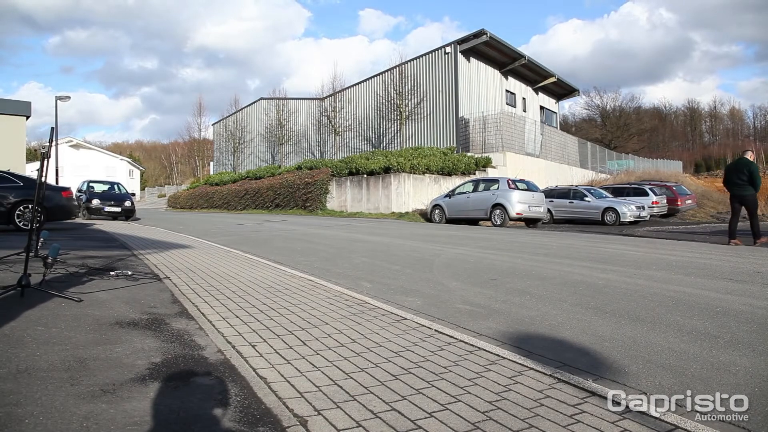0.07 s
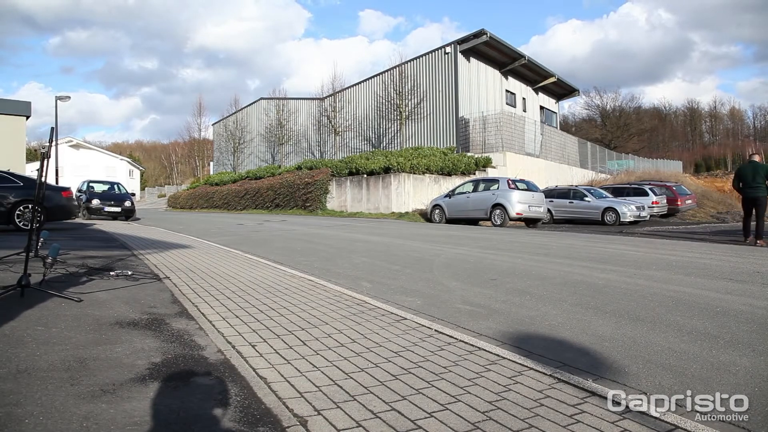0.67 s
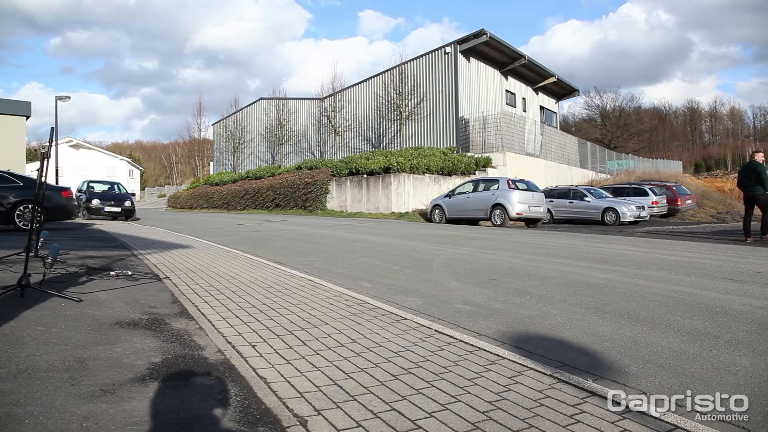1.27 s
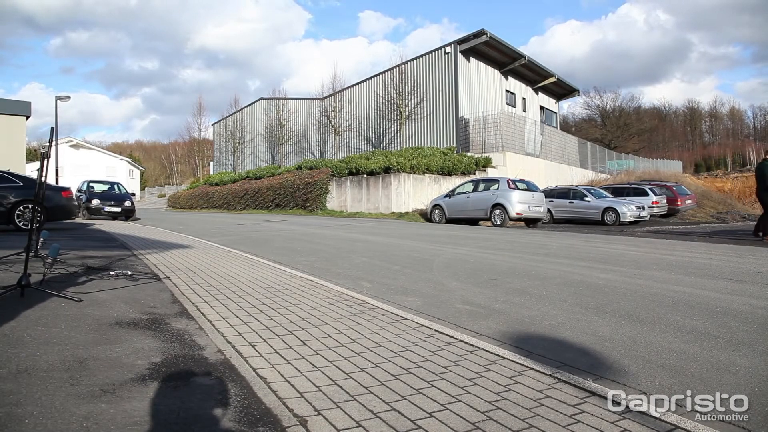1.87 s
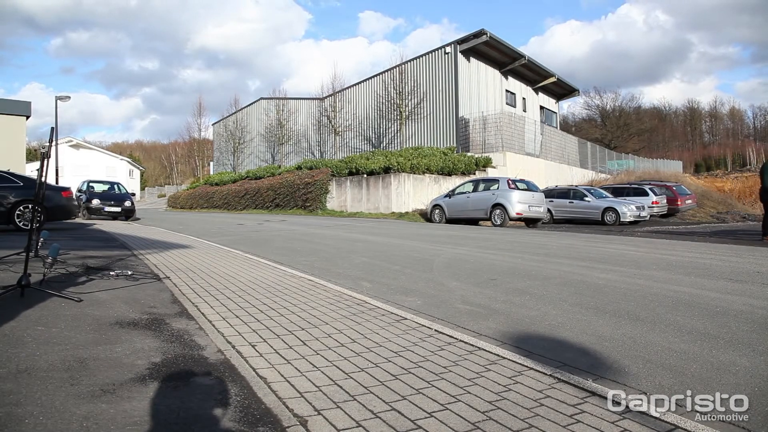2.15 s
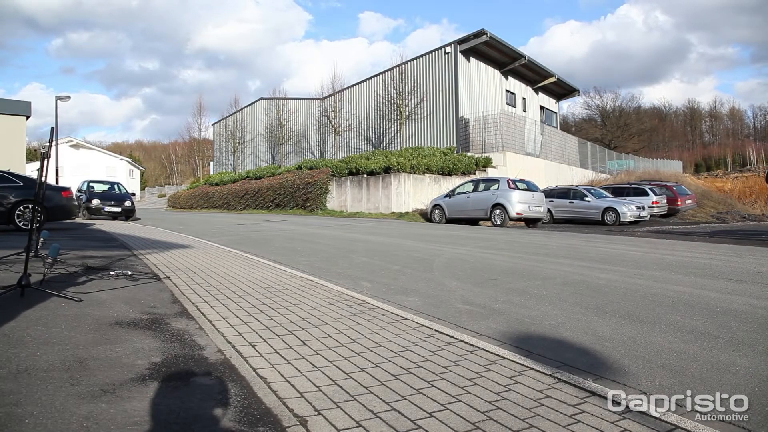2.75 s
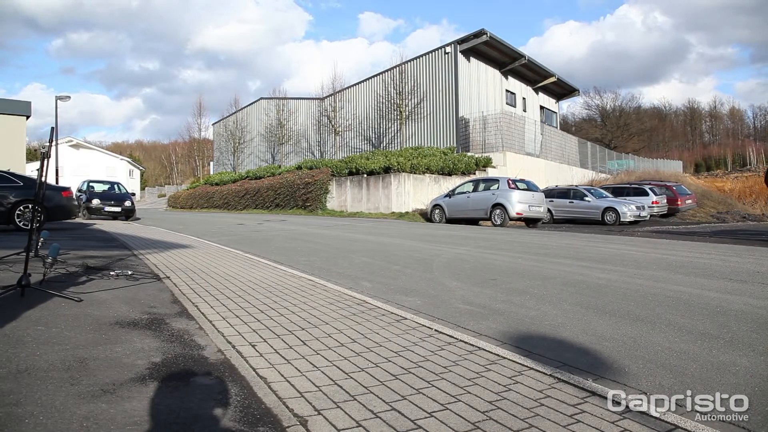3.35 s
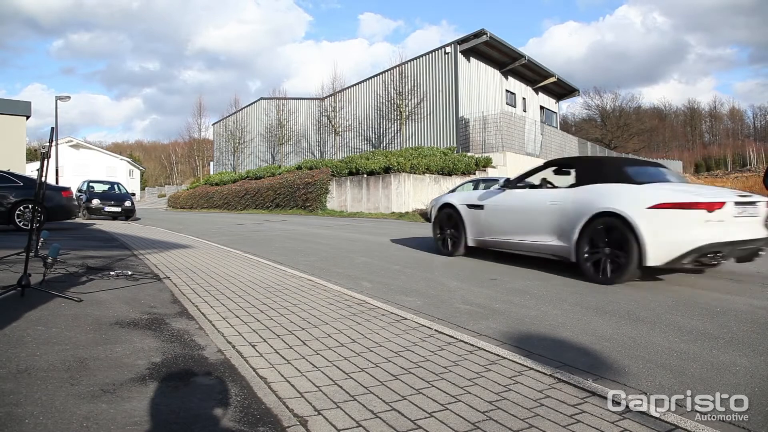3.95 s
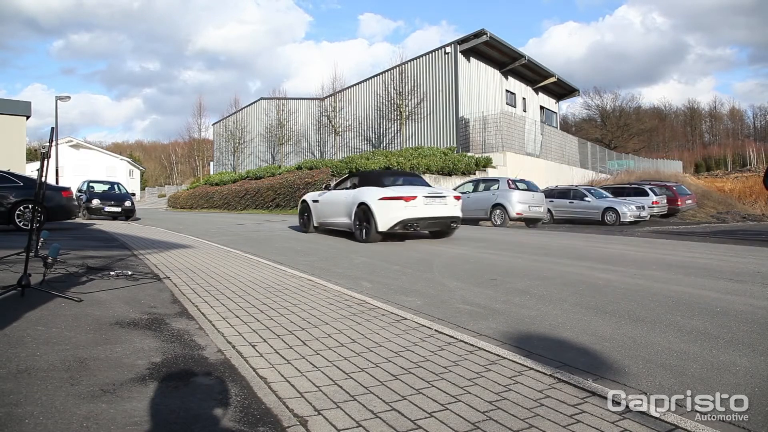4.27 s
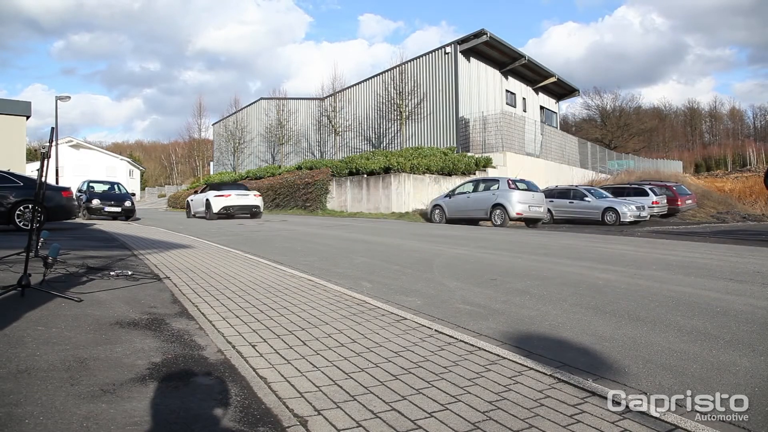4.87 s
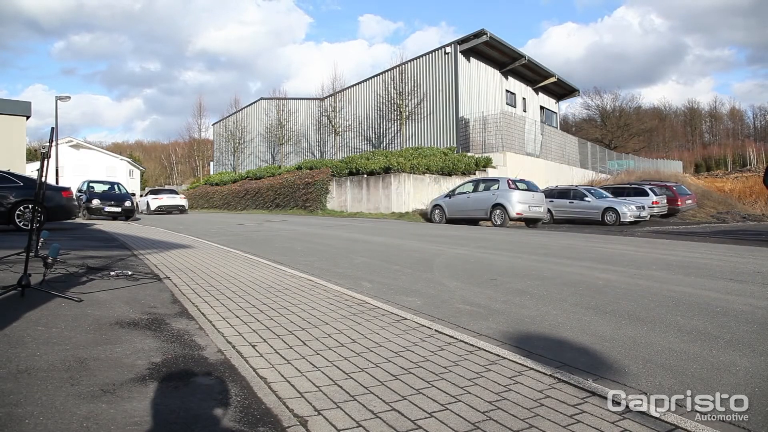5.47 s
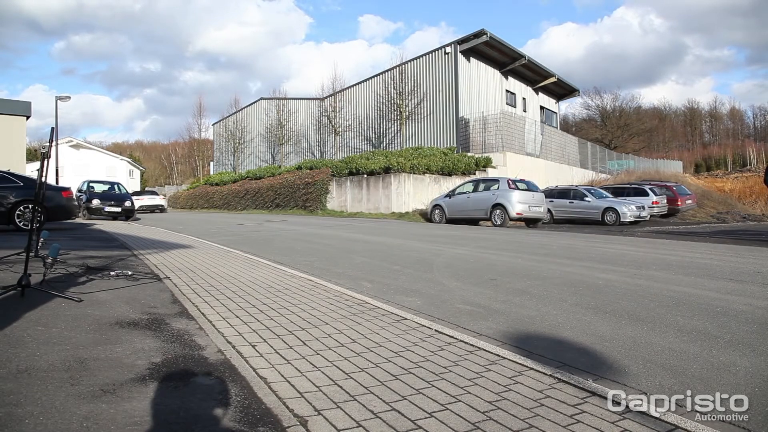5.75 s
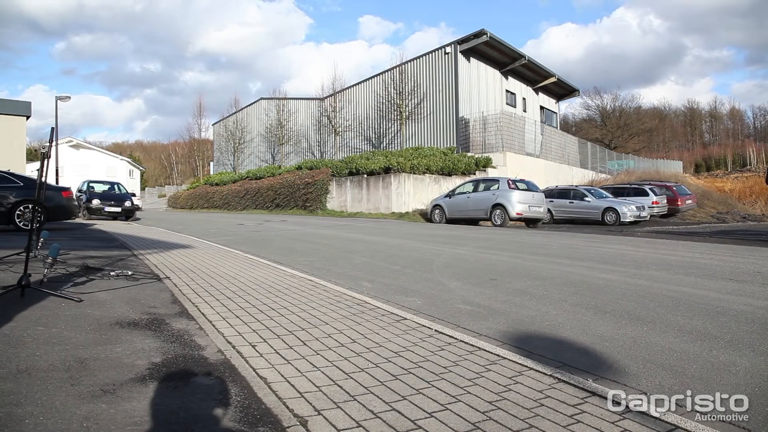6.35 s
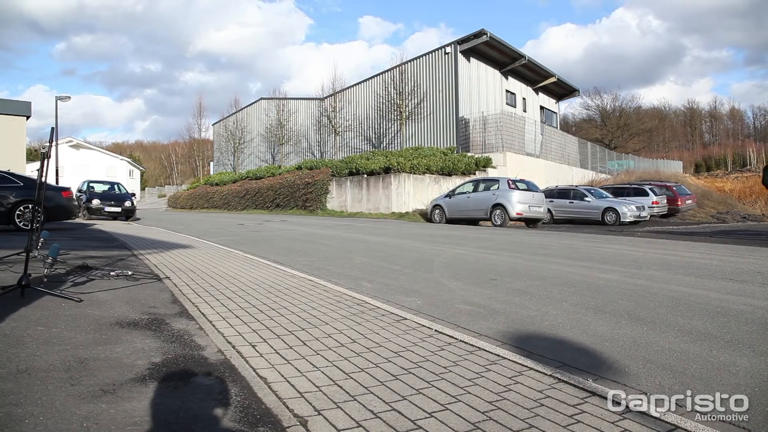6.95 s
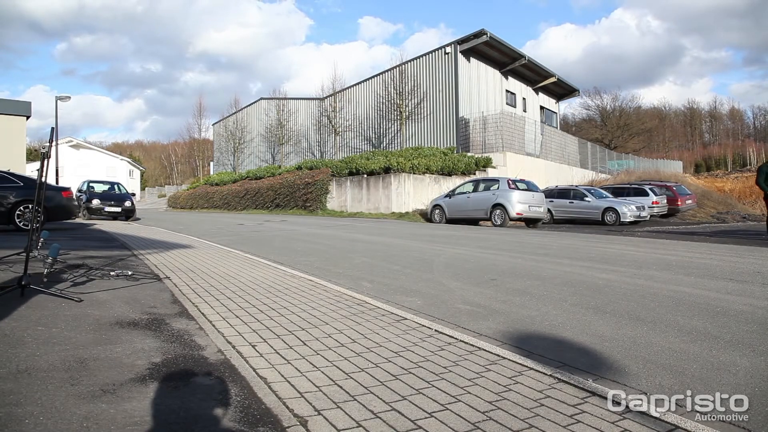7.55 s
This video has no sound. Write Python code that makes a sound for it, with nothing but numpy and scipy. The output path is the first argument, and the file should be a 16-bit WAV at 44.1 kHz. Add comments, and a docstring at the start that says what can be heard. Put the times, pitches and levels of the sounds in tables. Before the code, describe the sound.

A sports car approaches with a deep drone, roars by under throttle, then fires rapid exhaust pops while receding into the distance.

```python
"""V8 pass-by in a factory yard

A V8 sports car with an open exhaust accelerates past the microphone and drives off. Its engine orders
drone on the approach; the valves open to a rasping roar, unburnt fuel cracks in the tailpipes, then the
revs fall away. Walls and a distant hillside echo it. Soft thumps and scuffs sound close to the
microphone, and faint birds chirp over the yard's murmur at the end."""
import sys
import numpy as np
from scipy import signal
from scipy.fft import rfft, irfft
from scipy.io import wavfile
from scipy.ndimage import uniform_filter1d

SR = 44100
rng = np.random.default_rng(int(sys.argv[2]) if len(sys.argv) > 2 else 0)


def master_out(mix):
    """Clip the mix to full scale and print it as 16-bit PCM to the path in sys.argv[1]."""
    frames = np.transpose(np.atleast_2d(mix))
    ceiling = np.clip(frames, -1, 1)
    pcm = np.round(ceiling * 32767).astype(np.int16)
    wavfile.write(sys.argv[1], SR, pcm)


N = 340164
T = np.arange(N) / SR

# four-stroke cycle rate as heard at the microphone: (t/s, f/Hz)
CYCLE_RATE = [(0, 15.8), (.6, 18.8), (1.03, 20.9), (1.6, 17.8), (2.33, 20.5), (2.48, 20.1), (2.7, 21),
              (3.08, 22.7), (3.55, 31.8), (3.72, 31.0), (3.88, 30.2), (4.13, 28.3), (4.28, 30.3),
              (4.45, 30.8), (4.6, 32.1), (4.75, 32.4), (5.17, 35.2), (5.68, 41.3), (5.87, 36.8),
              (5.98, 32.8), (6.08, 30.8), (6.28, 30.6), (6.55, 26.6), (7.71, 18)]
# base level of the engine, and of the tyres on the approach, before the layer mix: (t/s, level/dB)
ENGINE_LEVEL = [(0, -47), (.3, -52), (.6, -45), (1.45, -41.5), (1.65, -44), (2.05, -36), (2.25, -38),
                (2.55, -35), (3.05, -20.5), (3.28, -16), (3.8, -14), (4.45, -17), (4.6, -21), (4.73, -23),
                (5.53, -29), (5.75, -38.5), (6.3, -51), (6.45, -49.5), (6.63, -52), (6.8, -51.5),
                (7.4, -58.5), (7.71, -72)]
TYRE_LEVEL = [(0, -53.5), (.8, -48), (1.15, -43), (1.7, -41), (2.4, -33.5), (2.8, -27.5), (3.1, -22)]
# side facing the microphone: (t/s, view: 0 front, 1 closing, 2 alongside, 3 tail, 4 far behind)
CAR_VIEW = [(2.6, 0), (2.9, 1), (3.2, 1), (3.55, 2), (4, 2), (4.2, 3), (5.55, 3), (5.85, 4)]
# leading orders (4 one bank, 5 and 13 the uneven beat, 8 firing, 16 its double) against the engine:
# {order: level/dB in each of the five views}
LEADING_ORDERS = {4: (-44, -36, -29, -15.5, -7), 5: (-29.5, -34, -39, -31, -16.5),
                  8: (-14, -16.5, -14, -16, -9.5), 12: (-42.5, -38, -14, -17.5, -38),
                  13: (-42, -40, -38, -33, -17), 16: (-12.5, -14.5, -26, -11.5, -31),
                  21: (-36, -40, -40, -33, -23)}
# resonances they sweep through: (order, f/Hz, half width/Hz, lift/dB)
RESONANCES = [(4, 150, 13, 17.5), (4, 110, 10, 6), (5, 153, 6.6, 15), (8, 183, 23, 14), (8, 279, 4.9, 13),
              (12, 364, 13, 11.5), (16, 325, 27, 15.5), (16, 508, 12, 13), (13, 348, 10, 18),
              (21, 545, 14, 14.5)]
# their change while cylinders skip: {order: change/dB}
MISFIRE_CHANGE = {4: -13.5, 5: -9, 8: 2.5, 12: -10, 13: -7, 16: -20.5, 21: -6}
# the other orders in each view: (multiple of the cycle rate, relative level/dB)
ORDERS_FRONT = [(5, -15.5), (7, -7.5), (10, -8.5), (11, -7), (12, -5), (13, -5.5), (14, -8.5), (15, 2),
                (17, -6), (18, -3), (22, -5), (23, -9), (24, -3.5), (25, -12), (26, -5.5), (27, -9)]
ORDERS_CLOSING = [(5, -4), (7, -10), (9, -8), (10, -1), (13, -11.5), (14, 3), (15, -11), (18, -9),
                  (21, -13.5), (30, -8)]
ORDERS_ALONGSIDE = [(2, -23), (3, -14), (5, -6.5), (6, -11), (7, -2), (9, -8.5), (10, 3), (11, -13),
                    (13, -13), (14, -7.5), (15, -10), (17, -22.5), (18, -14), (19, -10.5), (20, -9),
                    (21, -20.5), (22, -20), (23, -17.5), (24, -14.5), (25, -12), (26, -11)]
ORDERS_TAIL = [(2, -15.5), (3, -11.5), (5, 0), (6, -8.5), (7, -0.5), (9, 0.5), (10, -9.5), (11, -8),
               (13, -7), (14, -2.5), (15, -13.5), (17, -10), (18, -19), (19, -13), (20, -10), (21, -14.5),
               (22, -19), (23, -13.5), (24, -15.5), (25, -4.5), (26, -15.5), (27, -20), (28, -19),
               (29, -13.5), (30, -18)]
ORDERS_BEHIND = [(3, -25), (6, -9), (7, -2), (9, -16), (10, -20), (12, -5), (14, 2), (15, -12), (17, -7),
                 (18, -15), (20, -13.5)]
# spectra of the exhaust boom at a distance, close by and out of sight: (f/Hz, relative level/dB)
BOOM_FAR_EQ = [(35, -40.5), (70, -35.5), (125, -13.5), (200, -9), (320, -1.5), (400, -10), (470, -3),
               (540, -7), (620, -13.5), (700, -9), (780, -13.5), (900, -21), (1100, -36.5), (1500, -66),
               (6000, -110)]
BOOM_NEAR_EQ = [(20, -41), (45, -29.5), (90, -9.5), (145, -0.5), (220, -0.5), (350, 0.5), (490, 0.5),
                (650, -8.5), (780, -1), (1050, -21.5), (1500, -51)]
BOOM_HIDDEN_EQ = [(35, -51), (70, -34), (125, -16), (210, -4), (290, 2), (345, 12.5), (378, -11), (410, -9),
                  (450, -6), (525, -2.5), (620, -21), (800, -26), (1000, -35), (1500, -56), (6000, -100)]
# spectra of tyre rush, gas leaving the pipes and gas in the valves: (f/Hz, relative level/dB)
TYRE_EQ = [(450, -17.5), (740, 8), (1000, 4.5), (1300, -2), (1600, -1.5), (2000, 2.5), (2400, -9.5),
           (2850, -4), (3300, -13), (4300, -20), (6000, -38), (13000, -80)]
RASP_EQ = [(470, -17.5), (850, -1.5), (1100, 0), (1550, -4), (2400, -5.5), (3000, -12), (4000, -46),
           (13000, -73.5)]
HOWL_EQ = [(300, -31), (470, -2.5), (680, 2), (900, -0.5), (1200, -7.5), (2200, -40), (6000, -90)]
# spectra of the exhaust hiss from the side and from the tail, and of a crack: (f/Hz, relative level/dB)
SIZZLE_SIDE_EQ = [(1500, -23), (2400, -5), (2900, -1.5), (3500, 0), (4200, -3.5), (5000, 0), (5700, -1.5),
                  (6400, -2.5), (7500, -3.5), (9700, -15), (16000, -30)]
SIZZLE_TAIL_EQ = [(1500, -20), (2300, -5.5), (2950, 1), (3400, 3.5), (4000, -1), (4700, -2), (5900, -2),
                  (7100, -3), (9700, -16.5), (16000, -27)]
CRACK_EQ = [(300, -16), (700, 5.5), (1500, -3.5), (3000, 5), (4800, -0.5), (7200, 1.5), (9500, -8.5),
            (16000, -24)]
# explosions in the tailpipes: (t/s, relative level/dB)
EXHAUST_CRACKS = [(4.6146, -11.5), (4.6322, -9.5), (4.652, -11.5), (4.6818, -6.5), (4.7164, -10.5),
                  (4.7763, -2), (4.799, 4.5), (4.8108, 4.5), (4.8443, -1), (4.853, 1), (4.879, 4.5),
                  (4.922, 1), (4.9574, -4.5), (4.979, -1.5), (4.9922, -2.5), (4.999, -13), (5.0096, -7),
                  (5.0396, -12), (5.1297, -7), (5.1421, -7.5), (5.1624, -4.5), (5.1963, -1.5),
                  (5.2333, -13), (5.2461, -10.5), (5.2603, -6.5), (5.2721, 1), (5.2864, -3.5), (5.3076, -3),
                  (5.3847, -6.5), (5.4238, -4.5), (5.43, -16), (5.464, -3.5), (5.507, -11), (5.511, -17),
                  (5.521, -13), (5.5324, -9), (5.5477, -9), (5.5602, -14), (5.5911, -26), (5.6275, -21),
                  (5.6631, -13), (5.7043, -31), (5.7223, -26), (5.735, -30.5)]
# soft thumps by the microphone: (t/s, level/dB, f/Hz, decay/s)
CLOSE_THUMPS = [(.384, -31, 158, 0.0082), (.408, -39, 130, 0.0098), (.521, -27.5, 150, 0.0036),
                (.535, -41, 85, .008), (1.574, -33, 166, .005), (1.595, -47, 90, 0.0092)]
# faint scuffs by the microphone: (t/s, level/dB, length/s)
CLOSE_SCUFFS = [(0.323, -83, .1), (.55, -80, .08), (7.048, -72, .14), (7.239, -70, .08),
                (7.385, -67.5, 0.055), (7.462, -69, .028), (7.566, -69, 0.024), (7.623, -73.5, 0.023)]
# distant chirps: (t/s, length/s, f/Hz, level/dB)
BIRD_CHIRPS = [(6.1, 0.26, 3850, -71), (6.9, 0.32, 4390, -73), (7.273, 0.35, 3480, -72)]
# spectra of a thump's thud, a scuff, the hillside echo and the yard's murmur: (f/Hz, relative level/dB)
THUD_EQ = [(30, -32), (55, -12), (85, 0), (190, 0), (330, -8), (600, -30), (1500, -60)]
SCUFF_EQ = [(500, -12), (1500, -5), (4000, 0), (7500, -1), (11000, -16)]
HILL_EQ = [(60, -20.5), (110, -7), (152, 10), (215, 1.5), (280, -7.5), (350, 2.5), (420, -1.5), (490, -9),
           (550, -3), (650, -7.5), (820, -11), (1050, -19), (2000, -31.5), (9000, -75)]
YARD_EQ = [(18, -54), (30, -35), (76, -12), (211, 1.5), (511, -17), (645, -24.5), (774, -20.5),
           (928, -32.5), (3410, -32), (6040, -43.5), (11000, -56.5), (13000, -72)]
# each layer against the engine: (level/dB, then change/dB with open valves, with the tailpipes facing,
# while misfiring, in a volley of cracks, per metre driven away, once hidden)
ORDERS_BALANCE = (-7, 5, 2, -7.5, 1, 0.0322, -11)
BOOM_BALANCE = (-5, 2, -3, 3.5, 4, -0.0354, 0)
RASP_BALANCE = (-13, 6.5, 1.5, 2.5, 6, -0.5859, -4)
SIZZLE_BALANCE = (-18.5, 5, 10.5, -7, 9, 0, -18.5)

PASS_S, SPEED_M_S = 4.24, 13.3  # the car draws level with the microphone
# changes during the run: (middle t/s, length/s)
VALVES_OPEN, TAILPIPES_FACE, MISFIRING_STARTS = (3.122, .065), (3.923, .14), (4.65, .08)
FLARE_STARTS, FLARE_ENDS = (3.2, .08), (3.48, .098)  # the revs shoot up, heard mostly off the walls
SCREENED = (5.5, .038)  # a parked car comes in front of the tailpipes
CATCHES = (5.72, .18)  # the cylinders catch again for a last bark
CAR_HIDDEN, SPUTTER_ENDS = (5.89, .34), (6.05, .18)
# brief lifts around the lift-off: (middle t/s, half length/s, lift/dB)
RASP_SURGE, SIZZLE_SPIT, LIFT_OFF_THUD = (4.56, .053, 6.3), (4.6, .057, 5.9), (4.65, .033, 2.7)


def drone(cycles, leading_db, view, others_db, smear, waver_db=2.5):
    """Engine orders; shifting reflections make each waver in level and, the higher it is, in phase."""
    gains = {order: undb(db) for order, db in leading_db.items()}
    tables = ORDERS_FRONT, ORDERS_CLOSING, ORDERS_ALONGSIDE, ORDERS_TAIL, ORDERS_BEHIND
    for side, table in enumerate(tables):
        in_view = np.maximum(1 - np.abs(view - side), 0)
        weight = in_view * undb(others_db) / np.linalg.norm(undb(np.array(table)[:, 1]))
        for order, db in table:
            gains[order] = gains.get(order, 0) + weight * undb(db)
    out = 0
    for order, gain in gains.items():
        phase = 2 * np.pi * (order * cycles + rng.random()) + smear * order * walk(20)
        out = out + np.sqrt(2) * gain * undb(waver_db * walk(20)) * np.sin(phase)
    return out


def leading_level(order, cycle_hz, view, skipping):
    """A leading order's dB against the engine, from the side heard, nearby resonances and misfires."""
    swell_db = sum(db / (1 + ((order * cycle_hz - hz) / width) ** 2)
                   for k, hz, width, db in RESONANCES if k == order)
    side_db = np.interp(view, np.arange(5), LEADING_ORDERS[order])
    return side_db + swell_db + MISFIRE_CHANGE[order] * skipping


def tear(tones, depth, above_hz=260):
    """Unequal firings roughen the upper orders."""
    upper = tones - lowpass(tones, above_hz, order=4)
    return tones + depth * walk(180) * upper


def firings(cycles, scatter_db, jitter_s=.00025):
    """Eight pulses a cycle, lumpy as the banks take unequal turns, each varying in size and timing."""
    cylinder_db = np.array([3.5, -4.5, -4.5, 0, 1.5, -3, -.5, -2])
    count = np.floor(cycles * 8).astype(int)
    at = np.flatnonzero(np.diff(count))
    late = (jitter_s * SR * noise()[:len(at)]).astype(int)
    size_db = cylinder_db[count[at] % 8] + scatter_db[at] * np.clip(noise()[:len(at)], -2, 2)
    pulses = np.zeros(N)
    pulses[np.clip(at + late, 0, N - 1)] = undb(size_db)
    return pulses


def puffs(pulses, decay_s, jet):
    """Each firing releases a puff of turbulent gas over a steady jet."""
    gate = steady(decay(pulses, decay_s))
    return steady(noise() * (gate + jet))


def throb(cycles, size=128):
    """The part of the combustion that repeats every cycle: overtones whose balance slowly shifts."""
    shapes = rng.standard_normal((3, size))
    grid = np.arange(size) / size
    return steady(sum(walk(5) * np.interp(cycles, grid, shape, period=1) for shape in shapes))


def boom(pulses, cycles, near, hidden, regular):
    """Combustion rings the pipes: an even burble from afar, deep and lumpy close to the microphone."""
    burble = np.sqrt(regular) * throb(cycles)
    burble += np.sqrt(1 - regular) * puffs(pulses, decay_s=.0039, jet=1)
    distant = blend(colour(burble, BOOM_FAR_EQ), colour(burble, BOOM_HIDDEN_EQ), hidden)
    close = colour(puffs(pulses, decay_s=.0019, jet=.29), BOOM_NEAR_EQ)
    return steady(blend(steady(distant), close, near), size=3000)


def rasp(pulses, gas_share):
    """Smooth tyre rush at a distance gives way to gas tearing out of the pipes."""
    tyres = colour(noise(), TYRE_EQ)
    gas = colour(puffs(pulses, decay_s=.005, jet=1), RASP_EQ)
    return steady(bounces(blend(tyres, gas, gas_share)))


def howl(pulses, engine_db):
    """Gas forced past the half-open valves howls before the full rasp takes over."""
    gas = colour(puffs(pulses, decay_s=.0045, jet=.45), HOWL_EQ)
    return bump(s=3.1, half_length_s=.33, height=undb(engine_db - 11)) * gas


def sizzle(pulses, shock, facing, top_db):
    """Strong pulses steepen into shock clicks over the hiss; top_db moves the highest band most."""
    clicks = puffs(pulses ** 2, decay_s=.0015, jet=.03)
    hiss = puffs(pulses, decay_s=.0029, jet=1.4)
    source = np.sqrt(shock) * clicks + np.sqrt(1 - shock) * hiss
    aimed = blend(colour(source, SIZZLE_SIDE_EQ), colour(source, SIZZLE_TAIL_EQ), facing)
    bright = steady(bounces(aimed))
    dull, dullest = lowpass(bright, 8600, order=5), lowpass(bright, 4800, order=2)
    return dullest + undb(.36 * top_db) * (dull - dullest) + undb(top_db) * (bright - dull)


def treble_level(distance_m, roar_started, lull, screened):
    """The sizzle's top in dB: dull on the quiet approach, bright once the roar starts, then fading."""
    passing_db = np.maximum(9.5 - distance_m, -5)  # brightest at the pass
    return passing_db - 22 * (1 - roar_started) - 13.5 * lull - 6.5 * screened


def cracks(screened, gain_db=-7):
    """Unburnt fuel explodes in the tailpipes: a shock front, then a short burst of gas."""
    out = np.zeros(N)
    t = T[:SR // 20]
    for s, db in EXHAUST_CRACKS:
        ring_s = .0021 * np.exp(-.73 * (s - EXHAUST_CRACKS[0][0]))  # shorter as the car leaves
        burst = rng.standard_normal(len(t)) * np.exp(-t / ring_s)
        burst[0] = 7  # shock front
        add(out, s + .0006, undb(db + gain_db) * burst)
    bangs = colour(slap_echo(out), CRACK_EQ)
    return blend(bangs, lowpass(bangs, 6900, order=2), screened)  # duller behind the parked car


def volleys(drive_db=7.5):
    """Cracks in quick succession keep the exhaust stirred up, 0-1."""
    kicks = np.zeros(N)
    for s, db in EXHAUST_CRACKS:
        add(kicks, s, undb([db + drive_db]))
    return np.tanh(decay(kicks, decay_s=.02))


def bounces(x, lags_s=(.0007, .0013, .0026), drift=.065, gain=.15):
    """Road and bodywork reflect over short paths that shift as the car moves, rippling its colour."""
    copies = sum(np.interp(T - lag_s * (1 + drift * walk(3)), T, x) for lag_s in lags_s)
    return (x + gain * copies) / np.sqrt(1 + len(lags_s) * gain ** 2)


def slap_echo(x, slap_s=.011, slap_db=-7.5, tail_db=-10.5, t60_s=.18):
    """Nearby cars and walls scatter the sound into a grainy slap and a duller tail."""
    t = T[:SR]
    slap = (t > slap_s) * np.exp(-np.abs(t - slap_s) / .0031)
    tail = np.minimum(t / .005, 1) * undb(-60 * t / t60_s) ** 2
    powers = [signal.fftconvolve(x * x, shape / shape.sum())[:N] for shape in (slap, tail)]
    first, late = (noise() * np.sqrt(np.abs(power)) for power in powers)
    late = signal.sosfilt(signal.butter(4, 7500, fs=SR, output="sos"), late)
    return x + undb(slap_db) * first + undb(tail_db) * late


def wall_echo(x, share, delay_s=.03, t60_s=.75):
    """Echoes off the yard walls reach the microphone at an earlier pitch and blur a fast glide."""
    t = T[:SR // 2]
    walls = rng.standard_normal(len(t)) * (t > delay_s) * undb(-60 * t / t60_s)
    return np.sqrt(1 - share) * x + np.sqrt(share) * convolve(x, walls)


def hillside(x, delay_s=1.66, spread_s=.06, gain_db=-44.5):
    """The far wooded slope returns the roar and the cracks much later, as a dull, blurred rumble."""
    age = np.maximum(T[:3 * SR] - delay_s, 0) / (spread_s / 2)
    trees = rng.standard_normal(len(age)) * age * np.exp(-age)
    return undb(gain_db) * colour(convolve(x, trees), HILL_EQ)


def thumps(thud_gain=.26, thud_decay_s=.022):
    """Dull knocks close to the microphone: a soft push, a heavily damped ring and a low thud."""
    rings, thud = np.zeros(N), np.zeros(N)
    t = T[:SR // 5]
    for s, db, hz, decay_s in CLOSE_THUMPS:
        age = t / decay_s
        add(rings, s, undb(db) * age * np.exp(1 - age) * np.sin(2 * np.pi * hz * t))
        add(thud, s, undb(db) * np.exp(-t / thud_decay_s))
    return rings + thud_gain * colour(thud * noise(), THUD_EQ)


def scuffs():
    """Short, faint scrapes close to the microphone."""
    envelope = np.zeros(N)
    for s, db, length_s in CLOSE_SCUFFS:
        add(envelope, s, undb(db) * np.hanning(int(length_s * SR)))
    return envelope * colour(noise(), SCUFF_EQ)


def birds():
    """Faint chirps far from the microphone, each a tone blurred by a fast waver in pitch."""
    out = np.zeros(N)
    for s, length_s, hz, db in BIRD_CHIRPS:
        n = int(length_s * SR)
        pitch_hz = hz * (1 + .06 * walk(900)[:n])
        add(out, s, undb(db) * np.sqrt(np.hanning(n)) * np.sin(2 * np.pi * np.cumsum(pitch_hz) / SR))
    return out


def yard(level_db=-53.5):
    """The low, distant murmur of the place, drifting slightly in level."""
    return colour(noise(), YARD_EQ) * undb(level_db + walk(1.4))


def undb(db):
    """Decibels to gain."""
    return np.exp(np.asarray(db) * (np.log(10) / 20))


def curve(table):
    """A line through (t/s, value) points."""
    return np.interp(T, *np.transpose(table))


def onset(s, length_s):
    """A ramp from 0 to 1 around a time."""
    return np.clip((T - s) / length_s + .5, 0, 1)


def bump(s, half_length_s, height):
    """A bell-shaped lift around a time."""
    return height * np.exp(-((T - s) / half_length_s) ** 2)


def blend(a, b, share):
    """Crossfade from a (share 0) to b (share 1)."""
    return (1 - share) * a + share * b


def noise():
    """White noise of unit level."""
    return rng.standard_normal(N)


def walk(per_s):
    """Random levels joined by lines, per_s of them a second; spread near 1."""
    count = int(T[-1] * per_s) + 2
    return np.sqrt(3 / 2) * np.interp(T * per_s, np.arange(count), rng.standard_normal(count))


def steady(x, size=6000):
    """Scale to a running level of 1, leaving the fast grain."""
    power = uniform_filter1d(uniform_filter1d(x * x, size), size)
    return x / np.sqrt(np.abs(power) + 1e-14)


def decay(pulses, decay_s):
    """Give each pulse an exponential tail."""
    return signal.lfilter([1], [1, -np.exp(-1 / (decay_s * SR))], pulses)


def lowpass(x, hz, order):
    """Smooth low-pass without delay."""
    return signal.sosfiltfilt(signal.butter(order, hz, fs=SR, output="sos"), x)


def convolve(x, response):
    """Apply an impulse response scaled to unit energy."""
    return signal.fftconvolve(x, response / np.linalg.norm(response))[:N]


def colour(x, points, size=4096):
    """Minimum-phase filter of unit energy through (f/Hz, level/dB) points."""
    hz, db = np.transpose(points)
    grid = np.maximum(np.arange(size // 2 + 1) * SR / size, 1)
    cepstrum = irfft(np.log(undb(np.interp(np.log(grid), np.log(hz), db))))
    cepstrum[1:size // 2] *= 2
    cepstrum[size // 2 + 1:] = 0
    return convolve(x, irfft(np.exp(rfft(cepstrum))))


def add(track, s, sound):
    """Mix a sound into a track at a time."""
    i = max(int(s * SR), 0)
    track[i:i + len(sound)] += sound[:N - i]


def scene():
    """One crankshaft drives drone, boom, rasp and sizzle; valves, misfires and distance set the mix."""
    cycle_hz, engine_db, view = curve(CYCLE_RATE), curve(ENGINE_LEVEL), curve(CAR_VIEW)
    cycles = np.cumsum(cycle_hz * (1 + .002 * walk(20))) / SR
    along_m = SPEED_M_S * (T - PASS_S)
    away_m = np.clip(along_m, 0, SPEED_M_S * (CAR_HIDDEN[0] - PASS_S))

    # states of the car, each 0-1
    valves, facing = onset(*VALVES_OPEN), onset(*TAILPIPES_FACE)
    screened, hidden = onset(*SCREENED), onset(*CAR_HIDDEN)
    roaring = valves * (1 - hidden)
    flare = onset(*FLARE_STARTS) * (1 - onset(*FLARE_ENDS))
    lifted = onset(*MISFIRING_STARTS)
    misfiring = lifted * (1 - hidden)
    skipping = lifted * (1 - onset(*CATCHES))
    sputter = lifted * (1 - onset(*SPUTTER_ENDS))
    volley = volleys()
    near = valves * np.interp(np.abs(along_m), [3.5, 19], [1, 0])

    state = np.array([np.ones(N), valves, facing, misfiring, volley, away_m, hidden])
    balance = np.array([ORDERS_BALANCE, BOOM_BALANCE, RASP_BALANCE, SIZZLE_BALANCE])
    orders_db, boom_db, rasp_db, sizzle_db = engine_db + balance @ state
    # until the valves open the hiss is the tyres', which ignore quick changes of throttle
    rolling_db = (1 - valves) * (curve(TYRE_LEVEL) - engine_db)
    rasp_db += rolling_db + bump(*RASP_SURGE)
    sizzle_db += rolling_db + bump(*SIZZLE_SPIT)
    boom_db += bump(*LIFT_OFF_THUD)

    leading_db = {k: engine_db + leading_level(k, cycle_hz, view, skipping) for k in LEADING_ORDERS}
    tones = drone(cycles, leading_db, view, orders_db, smear=blend(.033, .02, roaring))
    tones *= 1 + .17 * (1 - valves) * walk(60)  # the tones flutter in level on light throttle
    tones = tear(tones, depth=.24 * np.maximum(roaring, sputter))
    tones = wall_echo(tones, share=.04 * (1 - valves) + .55 * flare + .45 * skipping)

    pulses = firings(cycles, scatter_db=2 + .8 * misfiring)
    regular = blend(.38, .15, roaring) * (1 - sputter)  # share of the burble that repeats every cycle
    low = tones + undb(boom_db) * boom(pulses, cycles, near, hidden, regular)
    chug = hidden * np.clip(.13 * (22.7 - cycle_hz), 0, .6)  # the slowing engine throbs once a cycle
    low *= 1 + chug * np.cos(2 * np.pi * cycles)
    middle = undb(rasp_db) * rasp(pulses, gas_share=.8 * roaring) + howl(pulses, engine_db)

    shock = (.054 * valves + .55 * facing + .3 * misfiring) * (1 - hidden)  # share of clicks
    top_db = treble_level(np.abs(along_m), valves, misfiring * (1 - volley), screened)
    sharp = cracks(screened) + undb(sizzle_db) * sizzle(pulses, shock, facing, top_db)
    ceiling = .37  # the loudest cracks and sizzle are softly limited, so their peaks sound flattened
    car = low + middle + ceiling * np.tanh(sharp / ceiling)
    return (car + hillside(car) + thumps() + scuffs() + yard() + birds())[None]


def record(dry):
    """The mono microphone chain thins the deepest bass, rounds the highest peaks and cuts the top."""
    thin = signal.sosfilt(signal.butter(2, 32, "high", fs=SR, output="sos"), dry)
    rounded = np.tanh(1.2 * thin) / 1.2
    return signal.sosfilt(signal.ellip(8, .2, 70, 15900, fs=SR, output="sos"), rounded)


dry = scene()
out = record(dry)
master_out(out)
```